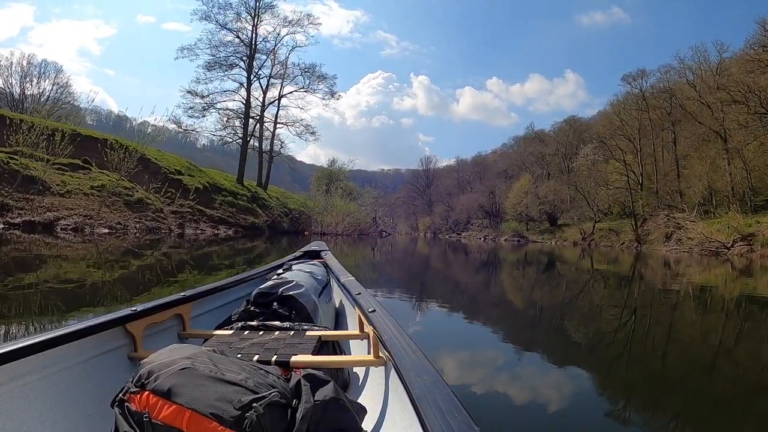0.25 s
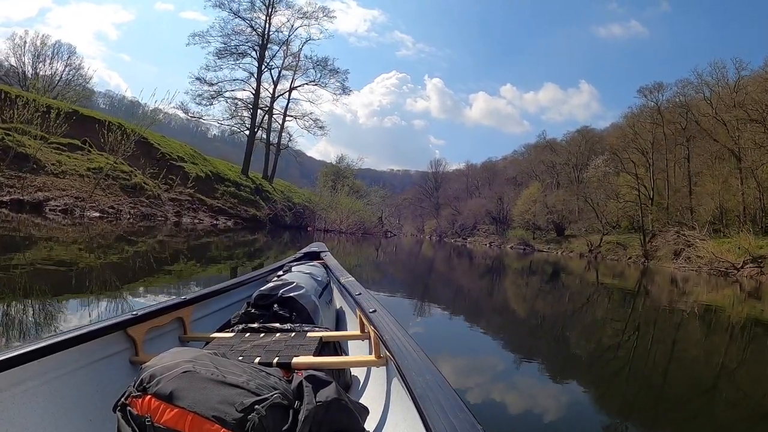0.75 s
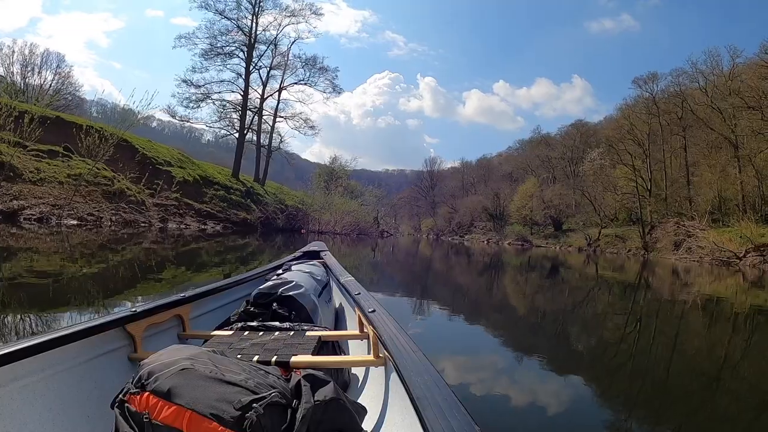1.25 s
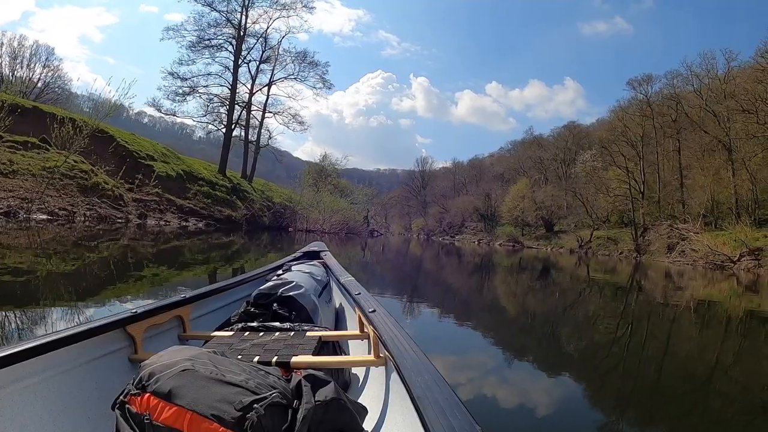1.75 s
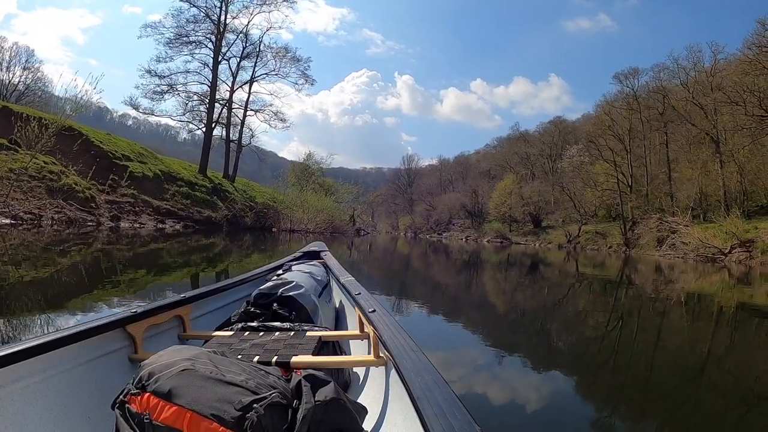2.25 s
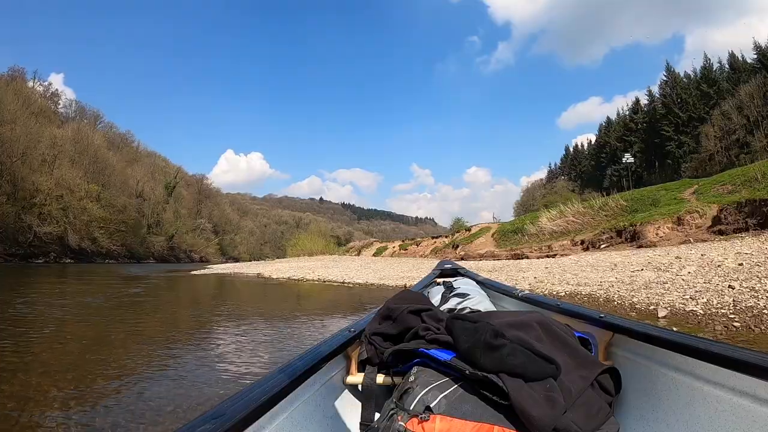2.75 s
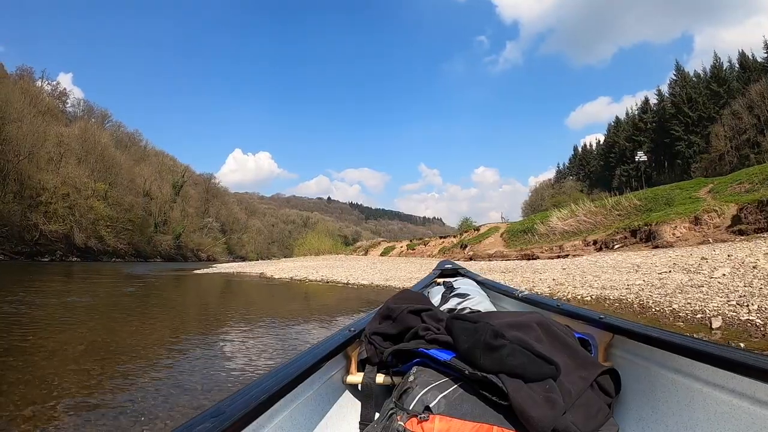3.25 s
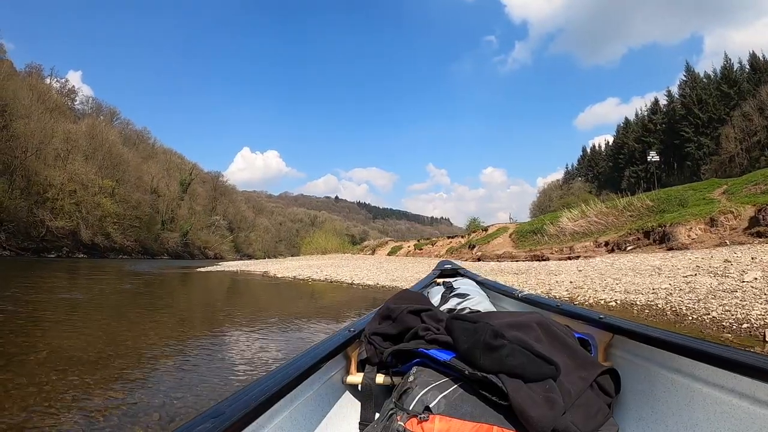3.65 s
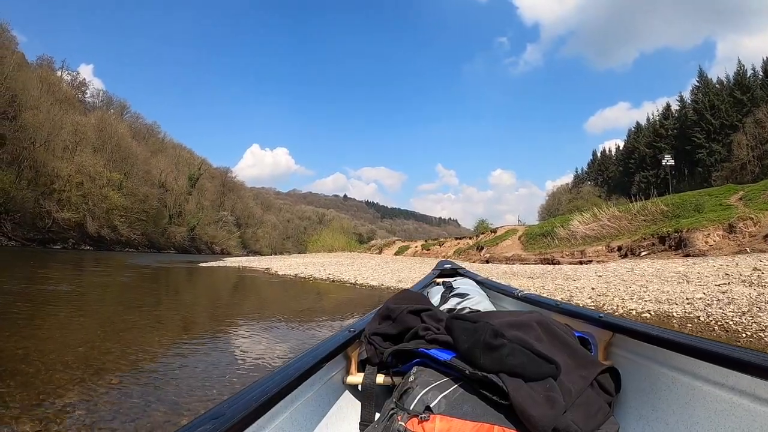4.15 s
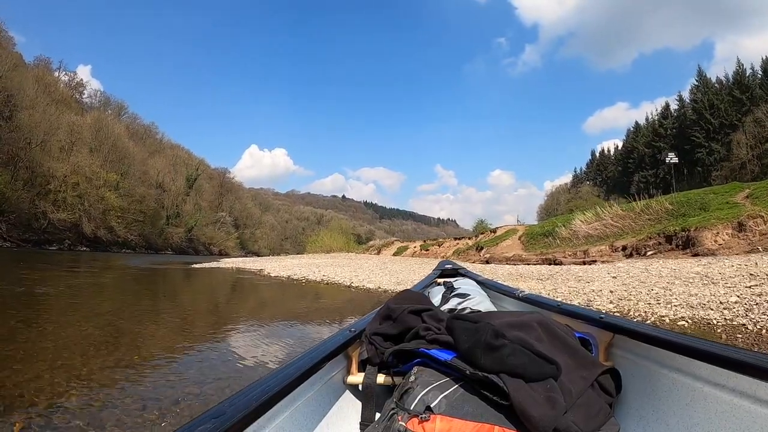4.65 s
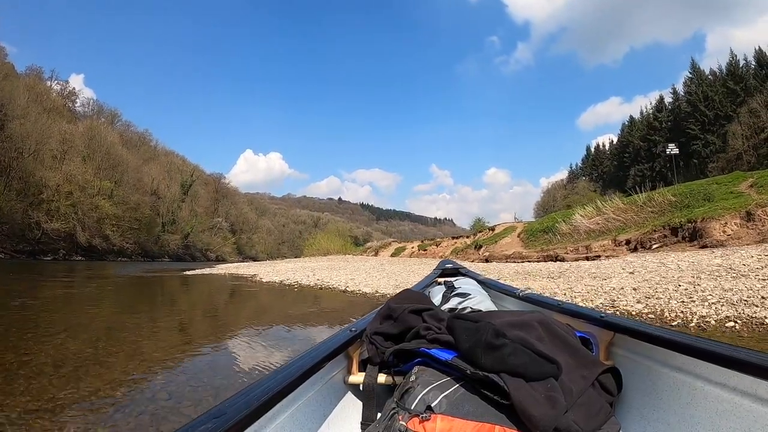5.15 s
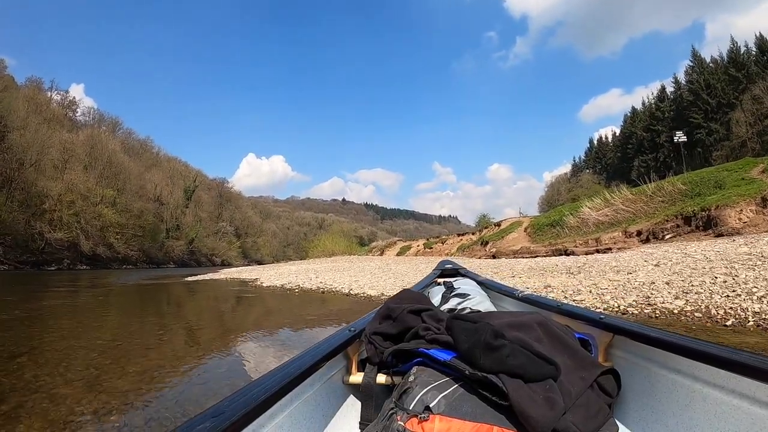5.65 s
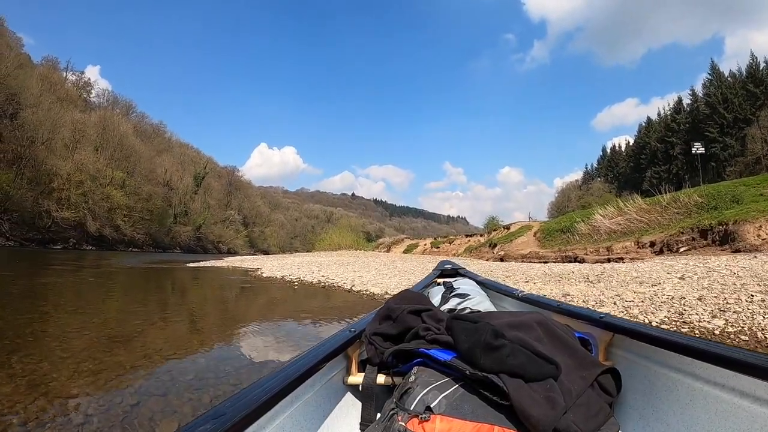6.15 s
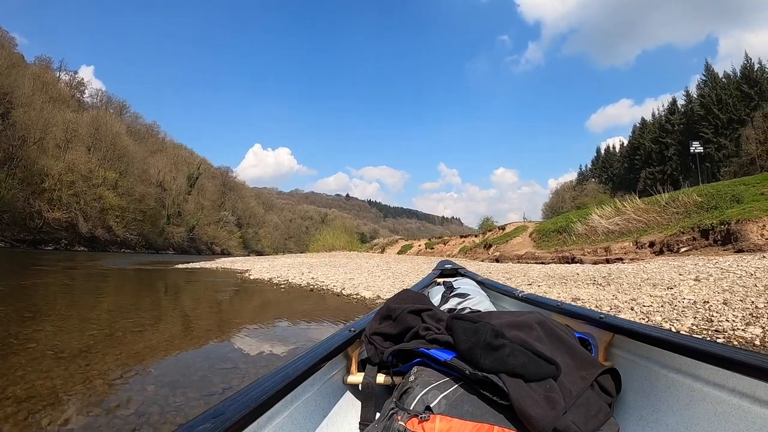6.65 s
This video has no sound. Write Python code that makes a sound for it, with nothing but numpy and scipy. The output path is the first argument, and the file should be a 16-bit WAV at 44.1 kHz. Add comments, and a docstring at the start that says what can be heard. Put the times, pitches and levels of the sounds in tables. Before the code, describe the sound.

A canoe drifts on a quiet wooded river: small birds chirp and whistle with a soft tree echo, a few drips fall, and a paddle knocks and rubs dully on the gunwale. Suddenly the place changes: wind thumps the microphone, water splashes and hisses at the bow, then the keel grinds loudly over shingle with stones knocking the hull until the end. Heard from inside the boat.

```python
"""Drifting canoe on a still river

Part one: songbirds (gliding sines echoed by trees), drips (ringing noise bursts), a paddle that knocks and
rubs the gunwale (a modal resonator), over the wooded bank's soft broadband noise.
Part two, a breezier reach in mono: the keel grinds over shingle (random slips through hull resonances),
stones knock the hull, ripples hiss along the bow and wind buffets the microphone (low-passed noise).
"""
import sys
import numpy as np
from scipy import signal
from scipy.fft import rfft, irfft, next_fast_len
from scipy.io import wavfile
from scipy.ndimage import uniform_filter1d

SR = 44100
rng = np.random.default_rng(int(sys.argv[2]) if len(sys.argv) > 2 else 0)


def log_audio(samples):
    """Write samples as a 16-bit WAV file to the path given in sys.argv[1]."""
    # one column per channel
    frames = np.atleast_2d(samples).T
    # limit to full scale, then quantise
    limited = np.clip(frames, -1, 1)
    pcm = np.round(limited * 32767).astype(np.int16)
    wavfile.write(sys.argv[1], SR, pcm)


N = 304731
T = np.arange(N) / SR  # s

CUT_S, FADE_S = 2.742, 0.018  # the change of place begins here, and its crossfade lasts this long
TOP_HZ = 15650  # upper edge of the whole sound

# Winding whistles. Each row: level in dB, pitch line of (time in seconds, pitch in Hz).
WHISTLE_LINES = [ (-49, [(.068, 5450), (.085, 5040), (.098, 5380), (.106, 3560)]), (-48.5, [(.822, 3070),
                 (.83, 3480), (.84, 2945), (.85, 3290), (.858, 3075), (.868, 3600), (.876, 3400),
                 (.888, 3550), (.9, 4140)]), (-45, [(1.006, 3790), (1.014, 4160), (1.026, 3150),
                 (1.036, 3270), (1.05, 2620)]), (-50.5, [(1.03, 4150), (1.062, 6100), (1.088, 4420),
                 (1.103, 4540), (1.13, 4240), (1.157, 5160), (1.174, 5100), (1.19, 4000)]),
                 (-52, [(1.488, 4300), (1.53, 4790), (1.56, 4670), (1.595, 5330), (1.625, 3360),
                 (1.65, 3640), (1.665, 3470)])]
# A second bird's calls, steep drops onto a held note. Each row: level in dB, pitch line of (seconds, Hz).
DROP_LINES = [(-59.5, [(1.914, 7230), (1.924, 5100), (1.936, 4700), (2.0, 4590)]), (-59, [(2.282, 6620),
              (2.29, 5300), (2.305, 4960), (2.325, 5060), (2.345, 3670), (2.37, 3500)]),
              (-71, [(2.646, 6940), (2.657, 4320), (2.675, 3700)])]
# Short slurs. Each row: start in seconds, length in seconds, first pitch in Hz, last pitch in Hz, level in dB.
SLUR_NOTES = [ (0, 0.0089, 4640, 4150, -53), (.005, 0.024, 5960, 5900, -65),
              (0.154, 0.034, 3410, 5950, -48.5), (0.165, 0.019, 3940, 2940, -55),
              (0.185, 0.012, 4600, 3750, -51.5), (0.196, 0.0092, 3800, 4540, -61),
              (0.271, 0.031, 3380, 5530, -49.5), (0.276, 0.0083, 3830, 2830, -57),
              (0.303, 0.011, 4560, 3830, -59), (0.691, 0.02, 4730, 3540, -66),
              (0.798, .02, 5500, 5420, -70), (0.827, 0.016, 6300, 5370, -62),
              (0.913, 0.02, 4050, 3800, -50), (0.934, 0.021, 4050, 3860, -49),
              (0.945, 0.019, 5400, 4300, -55), (1.273, 0.015, 4200, 3840, -56),
              (1.661, 0.12, 4270, 4110, -62), (2.25, 0.099, 8600, 8150, -83), (2.4, .14, 8850, 8800, -92),
              (2.4, 0.026, 4300, 4050, -70), (2.404, 0.074, 2790, 2690, -74)]
# One bird's repeated falling chip. Each row: start in seconds, level in dB.
CHIP_CALLS = [(1.073, -50), (1.109, -47), (1.17, -52.5), (1.244, -53), (1.318, -58), (1.386, -55.5),
              (1.47, -62)]
# Pitches in Hz at the start, turn and end of a chip: up, then down.
CHIP_PITCHES = (3170, 3500, 3230)
CHIP_STROKE_S = 0.007
# Fluttering notes deep in the trees. Each row: start in seconds, length in seconds, centre in Hz, level in dB.
FLUTTER_NOTES = [(2.304, .11, 3470, -79), (2.313, .08, 3900, -76), (2.535, .115, 3430, -67.5),
                 (2.545, .06, 3900, -70.5), (2.671, .075, 3450, -67), (2.694, .045, 3780, -66)]
FLUTTER_S, FLUTTER_HZ = 0.019, 70  # length of one beat, and its fall either side of the centre
# Quick faint notes under the main phrase: first time in seconds, last time in seconds, greatest level in dB.
TWITTER_SPAN = (0.87, 1.4, -62)
# Strength of the voice against pitch. Each row: pitch in Hz, relative strength in dB.
VOICE_STRENGTH = [(2700, -6.5), (3300, 4), (4300, -1), (5300, -10), (6200, -39), (9000, -21)]
# The same for the second bird. Each row: pitch in Hz, relative strength in dB.
DROP_VOICE_STRENGTH = [(3400, -6), (5050, -7), (5400, 1), (7000, -10)]
NOTE_EDGE = 0.1  # share of a short note spent fading in, and out
# A far bird's thin trill. Each row: time in seconds, centre pitch in Hz, mean level in dB.
TRILL_LINE = [(.25, 7300, -73), (.35, 7520, -64), (.45, 7570, -90), (0.551, 7630, -63),
              (0.672, 8120, -57.5), (.8, 7550, -77), (.9, 7460, -87)]
# Echo from the trees, stronger for deeper singers. Each row: time in seconds, level relative to direct in dB.
TREE_ECHO = [(0, -6.5), (.8, -9), (.83, -3.5), (1.49, -1), (2.74, -7)]

# Paddle striking the gunwale. Each row: time in seconds, push in dB, thud peak in dB, crack peak in dB.
PADDLE_KNOCKS = [(1.204, -55, -33, -34), (1.336, -58.5, -44, -45.5)]
# Paddle shaft dragged on the gunwale. Each row: time in seconds, drag force in dB, extra drive above 400 Hz
# in dB, extra drive below 130 Hz in dB.
PADDLE_RUB = [(1.42, -80.5, 11.5, -2), (1.6, -92.5, 21, 9.5), (1.72, -81, 14, -1), (1.78, -88.5, 15, 7),
              (1.82, -94.5, 24, -27), (2.008, -93, 15.5, -21), (2.2, -83.5, 13.5, -22),
              (2.264, -80, 9, -6.5), (2.45, -101, 23.5, -8), (2.7, -108, 12, -4)]
# Modes of the gunwale. Each row: frequency in Hz, gain in dB, 60 dB decay time in seconds.
GUNWALE_MODES = [(69, -1, 0.31), (113.6, 9.5, 0.24), (181, 7, 0.088), (231, 7, 0.089), (277, -12, 0.099),
                 (469, -17.5, 0.14), (556, -38, 0.088)]
# Left minus right level of each mode, in dB.
MODE_PAN = [0, -2.5, -16.5, 2, -6, -14, -12]
# Phase lead of the left channel for each mode, in radians.
MODE_LEAD = [0.78, 1.4, 1.2, 0.12, 0.2, 0.37, 0.53]
DRAG_FLICKER_DB = 2.8
DRAG_LOW_HZ = 90  # a light drag hardly stirs the deepest mode
RUB_HISS_HZ, RUB_HISS_DB = 1380, -74.5  # faint hiss of the dragged shaft

# Drips off the paddle. Each row: time in seconds, peak in dB, centre in Hz, left minus right level in dB.
DRIP_EVENTS = [(0.2324, -57, 4660, 8), (0.5293, -51, 4500, 4), (0.603, -52, 2740, 9),
               (0.609, -51.5, 6570, -1.0), (0.783, -49.5, 4470, 7)]

# Keel over the stones. Each row: time in seconds, weight on the stones in dB, rib grinding relative to it in dB.
KEEL_GRIND = [(4.135, -87, 16), (4.16, -40, 5.5), (4.22, -30, -2.5), (4.4, -31, -2.5), (4.56, -33.5, -1),
              (4.645, -36.5, -5), (4.815, -31, -2.5), (4.9, -33.5, 5), (4.985, -25, -6.5),
              (5.07, -29, -1.5), (5.155, -26.5, -1.5), (5.325, -27, 0.5), (5.495, -32, -3),
              (5.665, -26, -3), (5.835, -26.5, -6), (6.07, -33.5, -1), (6.175, -28.5, -1),
              (6.36, -32.5, -3), (6.46, -27, -5.5), (6.545, -30.5, -1.5), (6.63, -25, -3),
              (6.715, -32, 1.5), (6.8, -27, 0), (6.95, -31, -2.5)]
# Broad hull panels. Each row: resonance in Hz, width in Hz, relative gain in dB.
HULL_PANELS = [(137.7, 40.3, -9.5), (175.3, 77, -6.5), (277, 33.5, -1), (320, 26.5, -2.5), (442, 125, -2)]
# Stiffer parts of the hull. Each row: resonance in Hz, width in Hz, relative gain in dB.
HULL_RIBS = [(605, 90, 6.5), (782, 93, 5), (946, 115, 3.5), (1196, 215, 1), (1557, 210, -3),
             (2103, 97, -10)]
SHIFT_DB, SHIFT_PER_S = 1.5, 18  # depth scale and rate at which each resonance swells
# A stone caught under the keel. Each row: middle in seconds, length in seconds, peak in dB, resonance in Hz.
KEEL_JUDDERS = [(4.204, 0.035, -26, 320), (4.252, 0.18, -34.5, 2720), (4.291, 0.075, -24.5, 990),
                (4.496, 0.034, -23, 280), (4.794, 0.039, -19.5, 340), (4.867, 0.048, -24, 252),
                (5.011, 0.056, -17.5, 676), (5.168, 0.053, -16, 415), (5.242, 0.023, -22, 437),
                (5.285, 0.043, -20, 603), (5.317, .025, -19.5, 1080), (5.36, .03, -24, 287),
                (5.43, 0.054, -22, 296), (5.536, 0.038, -26, 970), (5.552, 0.031, -18, 301),
                (5.721, 0.035, -20.5, 302), (6.011, 0.028, -30, 267), (6.067, 0.13, -25, 770),
                (6.171, .06, -16, 269), (6.659, 0.033, -20, 560)]
JUDDER_SHARPNESS = 6.4  # ratio of centre to width
# Loose grit stirred up. Each row: time in seconds, level in dB, added fine sand in dB, added coarse scrape in dB
# (both relative to the grit).
GRIT_LEVELS = [(4.135, -54, -34, -16), (4.17, -43.5, -46, -5), (4.39, -39.5, -33, -5),
               (4.6, -47.5, -21, -9), (5.0, -43, -28.5, -6.5), (5.75, -44.5, -37, -8),
               (5.95, -49.5, -30, -6.5), (6.36, -49, -31, -7.5), (6.385, -43.5, -22.5, -12),
               (6.95, -41, -24, -13)]
# Spectral weighting of the grit. Each row: frequency in Hz, relative gain in dB.
GRIT_SPECTRUM = [(880, -66), (1500, -0.5), (2240, -7), (2940, -15), (3910, -10.5), (5090, -18.5),
                 (8370, -29), (12600, -41.5), (15500, -62)]
SAND_HZ, SCRAPE_HZ = 8430, 2740
# Single stones on the hull. Each row: time in seconds, strike strength in dB, base pitch in Hz, base 60 dB decay
# time in seconds.
STONE_STRIKES = [(4.17, -39, 4570, 0.088), (4.19, -39, 4500, .05), (4.325, -8, 869, 0.11),
                 (4.326, -25, 2670, 0.024), (4.428, -18.5, 583, 0.049), (4.435, -34, 4820, 0.078),
                 (4.613, -31, 4510, 0.06), (4.661, -40, 5200, .04), (4.751, -27, 1266, 0.043),
                 (4.959, -20, 4110, 0.022), (5.117, -25, 710, 0.049), (5.461, -28.5, 1460, 0.076),
                 (5.525, -30, 1010, 0.056), (6.22, -35.5, 4440, 0.017), (6.381, -40, 3060, 0.039),
                 (6.392, -21.5, 1930, 0.056), (6.432, -7.5, 1091, 0.047), (6.458, -31, 3440, .04),
                 (6.478, -32.5, 5500, 0.064), (6.495, -32, 4920, 0.069), (6.506, -18.5, 1305, 0.052),
                 (6.531, -36, 3360, 0.03), (6.574, -26, 2470, 0.024), (6.609, -27.5, 4070, 0.031),
                 (6.657, -26, 1005, 0.045), (6.682, -29.5, 3300, 0.049), (6.743, -19, 1900, 0.037),
                 (6.745, -21.5, 2840, 0.043), (6.795, -28, 1140, 0.069), (6.807, -12, 2490, 0.038),
                 (6.856, -29, 4030, 0.038)]
# Partials of a struck stone. Each row: pitch ratio, relative level in dB, decay ratio.
STONE_PARTIALS = [(0.401, -13, 1.1), (.66, -11.5, 1.1), (1.001, -3.5, 0.93), (1.29, -7.5, 0.7),
                  (1.541, -11.5, .7), (1.9, -13.5, 0.47), (2.9, -15, 0.41)]
CLEAN_RING_DB, CLEAN_DECAY, RATTLE_DB = -2.5, 1.3, -5  # clear tones: gain, decay ratio; looser rattle: gain
STONE_TOP_HZ = 4870  # wet stones ring dull above this

# Spectrum of the ripples. Each row: frequency in Hz, relative gain in dB.
RIPPLE_SPECTRUM = [(150, -2.5), (300, -2.5), (700, -5), (1400, 0), (2400, -6), (4000, -18), (8000, -32),
                   (11000, -42), (15000, -84)]
# Loudness of the ripples. Each row: time in seconds, mean level in dB.
RIPPLE_LEVELS = [(2.74, -52), (2.902, -56), (4.16, -55.5)]
RIPPLE_FLICKER_DB = 2.2
# Splashes at the bow. Each row: time in seconds, main peak in dB, base pitch in Hz, base 60 dB decay in seconds.
BOW_SPLASHES = [(2.788, -37, 1250, 0.12), (2.789, -57, 2910, 0.042), (2.814, -34.5, 318, 0.096),
                (3.1, -44, 1500, 0.1), (3.125, -38, 585, 0.052), (3.462, -62, 10000, .018),
                (3.675, -43.5, 373, 0.085), (3.728, -53, 8100, 0.015), (3.965, -58, 5000, 0.037),
                (3.984, -42.5, 2640, 0.12), (4.04, -55.5, 4860, 0.021), (4.108, -45, 5100, 0.1),
                (4.137, -37.5, 2000, 0.14)]
# A splash and its finer spray. Each row: pitch ratio, relative level in dB, decay ratio.
SPLASH_PARTIALS = [(1, 0, 0.93), (2.2, -10.5, 0.67), (3.3, -18, 0.54)]

# Wind on the microphone. Each row: time in seconds, level in dB.
WIND_LEVELS = [(2.74, -65), (2.9, -29.5), (3.2, -42.5), (3.56, -39.5), (3.66, -61.5), (4.24, -39.5),
               (5.93, -39), (6.01, -50), (6.78, -39), (6.95, -77)]
# Spectrum of the wind. Each row: frequency in Hz, relative gain in dB.
WIND_SPECTRUM = [(8, -28.0), (22, 4.0), (70, -2.0), (120, -12.0), (300, -71.5)]
# Puffs inside the gusts. Each row: peak time in seconds, peak in dB, low-pass corner in Hz.
WIND_PUFFS = [(2.863, -35, 173), (2.929, -21, 135), (3.026, -20.5, 205), (3.074, -20.5, 145),
              (3.167, -27, 140), (3.316, -27.5, 110), (3.374, -21, 168), (3.406, -22, 125),
              (3.483, -30.5, 151), (3.537, -21, 167), (3.787, -34.5, 120)]
PUFF_S = 0.037  # rise time, and fall time

# Spectrum of far water and air. Each row: frequency in Hz, relative gain in dB.
BANK_SPECTRUM = [(15, -48), (25, -19), (90, -10), (158, 0), (237, -3), (354, -10), (501, -11.5), (856, -16),
                 (1180, -10), (2370, -12), (3540, -12), (12400, -37), (15000, -68)]
# Likeness of left and right. Each row: frequency in Hz, correlation from 0 to 1.
BANK_LIKENESS = [(60, 0.6), (250, 0.56), (700, 0.12), (2500, 0.14), (15000, 0)]
BANK_DB = -65  # mean level

RISE_S = 0.0013  # build-up of a rattle


def birds():
    """Frequency modulation: gliding sines sing the notes and the trees reverberate them."""
    dry = np.zeros((2, N))
    warble_hz, flutter_db = 120 * walk(160), 1.3 * walk(130)  # an unsteady throat
    for level_db, line, throat in notes():
        s, hz = np.transpose(line)
        i = slice(int(s[0] * SR), int(s[-1] * SR))
        # fast runs shake, held notes stay clean
        shake = np.clip(1.6 - np.mean(np.diff(s)) / .022, .15, 1)
        glide = uniform_filter1d(np.interp(T[i], s, hz), 150) + shake * warble_hz[i]
        edge_s = min(NOTE_EDGE * (s[-1] - s[0]), .006)
        edge = np.clip(np.minimum(T[i] - s[0], s[-1] - T[i]) / edge_s, 0, 1)
        voice_db = np.interp(glide, *np.transpose(throat))
        loudness = np.sqrt(2) * undb(level_db + voice_db - voice_db.max() + shake * flutter_db[i])
        # each note reaches the right channel at its own phase
        turn = np.array([[0], [rng.uniform(-np.pi / 2, np.pi / 2)]])
        dry[:, i] += loudness * edge * np.sin(2 * np.pi * np.cumsum(glide) / SR + turn)
    dry += trill() * np.array([[1], [-.7]])
    echo = signal.fftconvolve(dry * undb(curve(TREE_ECHO)[0]), trees(), axes=1)[:, :N]
    return dry + echo


def notes():
    """Pitch contours: every note becomes (level in dB, pitch line, voice strength)."""
    chips = [(db, [(s + k * CHIP_STROKE_S, hz) for k, hz in enumerate(CHIP_PITCHES)]) for s, db in CHIP_CALLS]
    short = SLUR_NOTES + flutters() + twitter()
    slurs = [(db, [(s, a), (s + length, b)]) for s, length, a, b, db in short]
    first_bird = [(*note, VOICE_STRENGTH) for note in WHISTLE_LINES + chips + slurs]
    return first_bird + [(*note, DROP_VOICE_STRENGTH) for note in DROP_LINES]


def flutters():
    """Periodic repetition: a fluttering note is a run of tiny falling chips, uneven in pitch and strength."""
    out = []
    for start_s, length, hz, db in FLUTTER_NOTES:
        shift, size = rng.standard_normal((20, 2)).T
        beats = np.arange(start_s, start_s + length, FLUTTER_S)
        for s, a, b in zip(beats, .5 * shift, size):
            centre = hz + FLUTTER_HZ * a
            out.append((s, FLUTTER_S, centre + FLUTTER_HZ, centre - FLUTTER_HZ, db + 3 * b))
    return out


def twitter(count=70):
    """Random superposition: short slurs, up or down, from small birds further back."""
    start_s, end_s, db = TWITTER_SPAN
    when, pitch, slur, size = rng.random((count, 4)).T
    s, hz = start_s + (end_s - start_s) * when ** 1.1, 3000 + 1500 * pitch
    return list(zip(s, 0 * s + 0.013, hz, hz + 1100 * (slur - .6), db - 8 * size))


def trill():
    """Vibrato: a sine swept 38 times a second, roughened by random pitch and level."""
    s, hz, db = np.transpose(TRILL_LINE)
    sweep = np.interp(T, s, hz) + 500 * np.sin(2 * np.pi * 38 * T) + 250 * walk(200)
    level = undb(np.interp(T, s, db, -200, -200) + 7.5 * walk(60.4))
    return level * np.sin(2 * np.pi * np.cumsum(sweep) / SR)


def trees():
    """Diffuse reverberation: an impulse response of decaying noise, independent left and right."""
    t = np.arange(SR // 2) / SR
    late = np.minimum(t / 0.018, 1)  # the nearest trunks answer late
    response = rng.standard_normal((2, len(t))) * decay(t, 0.52) * late
    return response / np.sqrt(np.sum(response ** 2, axis=1, keepdims=True))


def gunwale():
    """Modal resonance: knocks and a stick-slip drag excite the same decaying modes."""
    push, cracks = knocks()
    drag, bright_db, deep_db, hiss = rub()
    out = 0
    for (hz, db, t60), pan_db, lead in zip(GUNWALE_MODES, MODE_PAN, MODE_LEAD):
        pole = np.exp(2j * np.pi * hz / SR - np.log(1000) / (t60 * SR))
        extra_db = bright_db if hz > 400 else deep_db if hz < 130 else 0
        ring = signal.lfilter([1], [1, -pole], push + drag * undb(extra_db))
        # turning the complex mode shifts its phase in the left channel
        out += undb(db) * pan(pan_db) * np.imag(ring * np.exp(1j * np.array([[lead], [0]])))
    wood = signal.butter(N=2, Wn=[48, 750], btype="band", fs=SR, output="sos")
    return signal.sosfilt(wood, out) + cracks + hiss


def knocks():
    """Impact: the shaft lands, presses in and judders on as decaying noise, with a thud and a crack."""
    push, rows = np.zeros(N), []
    for s, db, thud_db, crack_db in PADDLE_KNOCKS:
        after = np.clip(T - s, 0, None)
        push += undb(db) * rng.standard_normal(N) * (after / 0.012) * np.exp(-after / 0.018)
        rows += [(s, thud_db, 750, .09, 0), (s, crack_db, 2300, .04, 0)]
    return push, bursts(rows, 0.12, 1.0)


def rub():
    """Stick-slip friction: random grains of force, with a faint hiss while the shaft touches."""
    drag_db, bright_db, deep_db = curve(PADDLE_RUB)
    drag = grains(2700, 4.1) * undb(drag_db + DRAG_FLICKER_DB * walk(29.5))
    drag = signal.sosfilt(signal.butter(N=2, Wn=DRAG_LOW_HZ, btype="high", fs=SR, output="sos"), drag)
    touching = np.clip((drag_db + 117) / 15, 0, 1)
    hiss = touching * undb(RUB_HISS_DB) * unit(band(grains(4000, 2.6), RUB_HISS_HZ, 680)) * pan(15.0)
    return drag, bright_db, deep_db, hiss


def drips():
    """Transient resonance: each drip is a brief noise burst ringing round one pitch."""
    return bursts([(s, db, hz, .04, pan_db) for s, db, hz, pan_db in DRIP_EVENTS], 9.4, 1.6)


def shingle():
    """Forced vibration: stones slip under the keel in dense jerks that ring panels and ribs; grit crackles."""
    weight_db, grind_db = curve(KEEL_GRIND)
    jerk = walk(45)
    slips = grains(1300, 2.47)
    panels = unit(soften(body(slips, HULL_PANELS), 372)) * undb(0.66 * jerk)
    ribs = unit(soften(body(0.83 * slips + grains(1200, 1.2), HULL_RIBS), 3100))
    ribs = ribs * undb(grind_db + 0.43 * jerk + 0.65 * walk(50))
    return undb(weight_db) * (panels + ribs) + judders() + grit(jerk) + stones()


def body(x, modes):
    """Moving excitation: contact wanders along the keel, so each resonance swells and fades by itself."""
    out = 0
    for k, (hz, width, db) in enumerate(modes):
        out += (-1) ** k * undb(db + SHIFT_DB * walk(SHIFT_PER_S)) * band(x, hz, width)
    return out


def judders():
    """Stick-slip at resonance: short swells of irregular jerks, each in one narrow band."""
    out = np.zeros(N)
    for s, length, db, hz in KEEL_JUDDERS:
        n = int(length * SR)
        jerks = rng.standard_normal(2 * n) ** 3
        # the first half only lets the resonance build up
        ring = band(band(jerks, hz, hz / JUDDER_SHARPNESS), hz, hz / 2)[n:] * np.hanning(n) ** 0.96
        i = int(s * SR) - n // 2
        out[i:i + n] += undb(db) * ring / np.abs(ring).max()
    return out


def grit(jerk):
    """Granular noise: pebbles of each size crackle in their own band, with sand, scrape and clicks."""
    sizes = 0
    for hz in (2000, 3200, 5000, 8000, 12500):
        sizes += band(grains(2000, 4.5), hz, .35 * hz) * undb(3 * walk(16)) * hz ** -.5
    grit_db, sand_db, scrape_db = curve(GRIT_LEVELS)
    sand = undb(sand_db) * unit(band(band(sizes, SAND_HZ, 6300), SAND_HZ, 8100))
    rasp = unit(band(band(grains(900, 1.2), SCRAPE_HZ, 450), SCRAPE_HZ, 1800))
    scrape = undb(scrape_db + 1.7 * walk(35)) * rasp
    mixture = unit(shape(sizes, GRIT_SPECTRUM)) + sand + scrape + undb(-3) * pebbles()
    return mixture * undb(grit_db + 0.6 * jerk)


def pebbles(count=900):
    """Small-body impact: loose pebbles click and ring briefly; high ones tend to be fainter."""
    when, pitch, size, ring = rng.random((count, 4)).T
    start_s = KEEL_GRIND[0][0]
    hz = 900 * 6.5 ** pitch
    size_db = 4.5 * np.minimum(-np.log(1 - size), 3)
    return unit(tones(zip(start_s + (N / SR - start_s) * when, size_db - 16 * pitch, hz, (60 + 150 * ring) / hz)))


def stones():
    """Inharmonic impact: the hard first contact rings as clear, slightly detuned tones over a rattle."""
    rows = partials(STONE_STRIKES, STONE_PARTIALS)
    s, db, hz, t60, _ = np.transpose(rows)
    detuned = hz * (1 + 0.035 * rng.standard_normal(len(s)))
    clear = tones(zip(s, db + CLEAN_RING_DB, detuned, CLEAN_DECAY * t60))
    return soften(undb(RATTLE_DB) * bursts(rows, 3.7, 1.2)[0] + clear, STONE_TOP_HZ)


def ripples():
    """Water noise: random grains and steady noise fizz along the bow, with single resonant splashes."""
    fizz = unit(shape(grains(6000, 3.6) + 0.86 * rng.standard_normal(N), RIPPLE_SPECTRUM))
    level = undb(curve(RIPPLE_LEVELS)[0] + RIPPLE_FLICKER_DB * walk(40))
    return fizz * level + bursts(partials(BOW_SPLASHES, SPLASH_PARTIALS), 1.9, 0.5)[0]


def wind():
    """Turbulent pressure: slow low-frequency swells on the microphone, with short brighter puffs."""
    out = undb(curve(WIND_LEVELS)[0]) * unit(shape(rng.standard_normal(N), WIND_SPECTRUM))
    for s, db, top_hz in WIND_PUFFS:
        n = int(PUFF_S * SR)
        puff = soften(soften(rng.standard_normal(2 * n), top_hz), top_hz) * np.hanning(2 * n)
        i = int(s * SR) - n
        out[i:i + 2 * n] += undb(db) * puff / np.abs(puff).max()
    return out


def bank():
    """Partial coherence: far water and air as noise, most alike left and right in the bass."""
    mid, side = rng.standard_normal((2, N))
    mid = shape(mid, BANK_LIKENESS, lambda c: np.sqrt(1 + np.clip(c, 0, 1)))
    side = shape(side, BANK_LIKENESS, lambda c: np.sqrt(1 - np.clip(c, 0, 1)))
    flicker_db = 1.2 * walk(9)
    return unit(shape(np.array([mid + side, mid - side]), BANK_SPECTRUM)) * undb(BANK_DB + flicker_db)


def bursts(rows, sharpness, tick):
    """Resonant transients: each row (s, peak dB, Hz, t60 s, pan dB) a tick and rattle round one pitch."""
    out, t = np.zeros((2, N)), np.arange(SR // 8) / SR
    for s, db, hz, t60, pan_db in rows:
        rattle = rng.standard_normal(len(t)) * decay(t, t60) * np.minimum(t / RISE_S, 1)
        rattle[0] = tick * np.sqrt(SR / hz)
        ring = band(band(band(rattle, hz, hz / sharpness), hz, hz), hz, 1.5 * hz)
        ring = soften(ring, 2.08 * hz)
        i = int(s * SR)
        out[:, i:i + len(t)] += (pan(pan_db) * undb(db) * ring / np.abs(ring).max())[:, :N - i]
    return out


def tones(rows):
    """Free vibration: each row (s, dB, Hz, t60 s) a struck sine dying away exponentially."""
    out, t = np.zeros(N), np.arange(SR // 8) / SR
    for s, db, hz, t60 in rows:
        i = int(s * SR)
        out[i:i + len(t)] += (undb(db) * np.sin(2 * np.pi * hz * t) * decay(t, t60))[:N - i]
    return out


def partials(rows, ring):
    """Modal expansion: each event gains every partial of the table that lies below TOP_HZ."""
    return [(s, db + rel_db, hz * ratio, t60 * decay_ratio, 0) for s, db, hz, t60 in rows
            for ratio, rel_db, decay_ratio in ring if hz * ratio < TOP_HZ]


def grains(rate, spread_db):
    """Shot noise: random clicks, rate a second on average, mostly small and a few large, at unit RMS."""
    hit, size, sign = rng.random((3, N))
    strength = undb(spread_db * np.minimum(-np.log(1 - size), 4))
    return unit((hit < rate / SR) * strength * np.sign(sign - .5))


def walk(rate):
    """Slow random modulation: levels held 1 / rate s and smoothed twice."""
    k = int(SR / rate)
    held = np.repeat(rng.standard_normal(N // k + 1), k)
    return 1.096 * uniform_filter1d(uniform_filter1d(held, k), k)[:N]


def band(x, hz, width):
    """Simple resonance: gain 1 at the centre."""
    return signal.lfilter(*signal.iirpeak(min(hz, .45 * SR), hz / width, SR), x)


def soften(x, hz):
    """Blunt contact: a low-pass, for little energy above hz."""
    return signal.sosfilt(signal.butter(N=2, Wn=min(hz, .45 * SR), fs=SR, output="sos"), x)


def undb(db):
    """Decibel relation: amplitude ratio from a level."""
    return 10 ** (np.asarray(db) / 20)


def shape(x, rows, to_gain=undb):
    """Spectral weighting: (Hz, value) points joined on a log-frequency axis."""
    size = next_fast_len(N)
    hz, value = np.transpose(rows)
    log_hz = np.log(np.arange(size // 2 + 1) * SR / size + 1)
    return irfft(rfft(x, size) * to_gain(np.interp(log_hz, np.log(hz), value)), size)[..., :N]


def curve(rows):
    """Envelopes: a table's columns over time; the first is a dB level, silent outside the table."""
    s, *columns = np.transpose(rows)
    out = [np.interp(T, s, c) for c in columns]
    return [np.where((T >= s[0]) & (T <= s[-1]), out[0], -200)] + out[1:]


def decay(t, t60):
    """Exponential damping: a fall of 60 dB in t60 seconds."""
    return np.exp(-np.log(1000) * t / t60)


def pan(db):
    """Level difference: left and right gains that differ by db."""
    return undb(np.array([[db], [-db]]) / 2)


def unit(x):
    """Normalisation: RMS of 1."""
    return x / np.sqrt(np.mean(x ** 2))


def scene():
    """Superposition: the still reach crossfades into the breezier one."""
    second = np.clip((T - CUT_S) / FADE_S, 0, 1)
    still = birds() + gunwale() + drips() + bank()
    breezy = shingle() + ripples() + wind()
    return still * (1 - second) + breezy * second


def record(dry):
    """Band limiting: a faint hiss of its own joins each channel, then the top is cut."""
    hiss = undb(-105) * rng.standard_normal(dry.shape)
    return signal.sosfilt(signal.ellip(8, .2, 70, TOP_HZ, fs=SR, output="sos"), dry + hiss)


dry = scene()
out = record(dry)
log_audio(out)
```